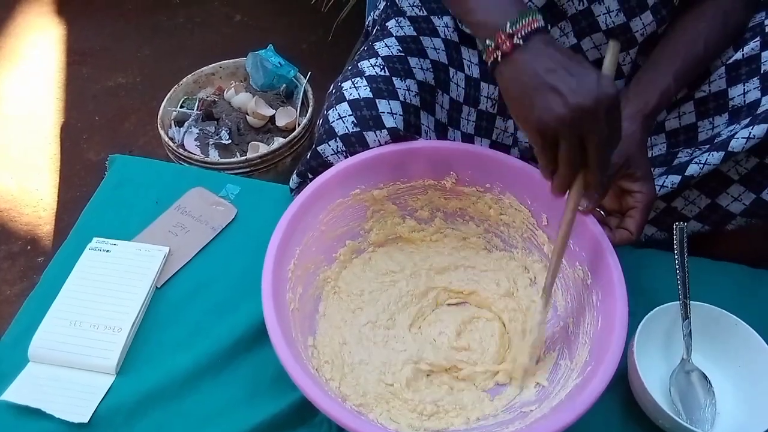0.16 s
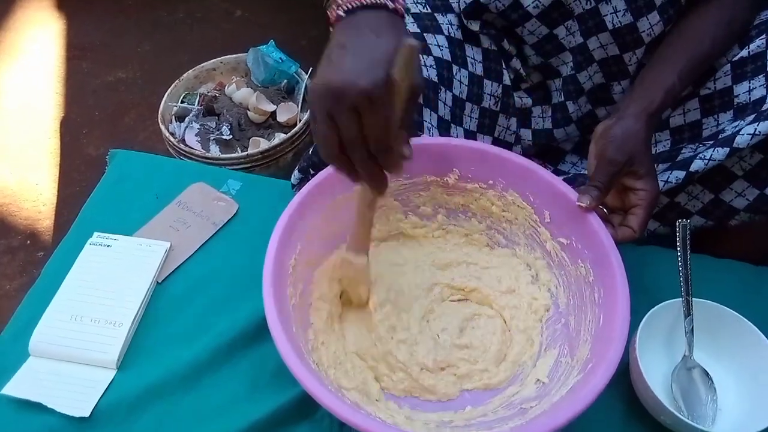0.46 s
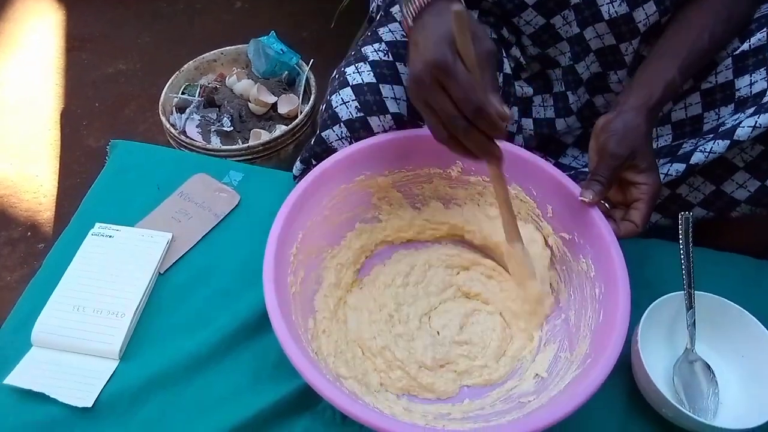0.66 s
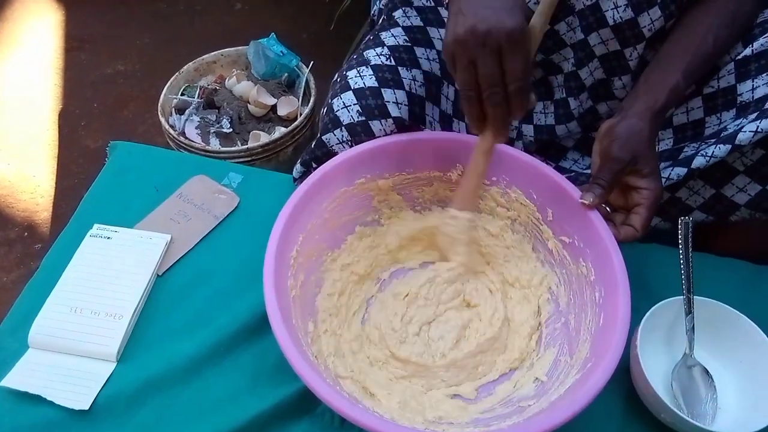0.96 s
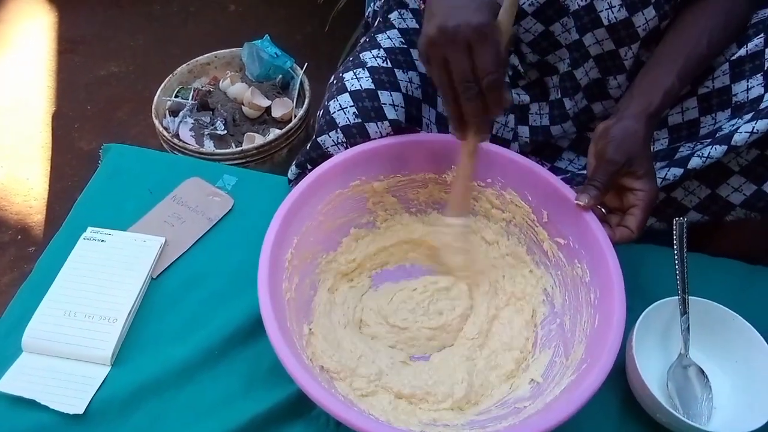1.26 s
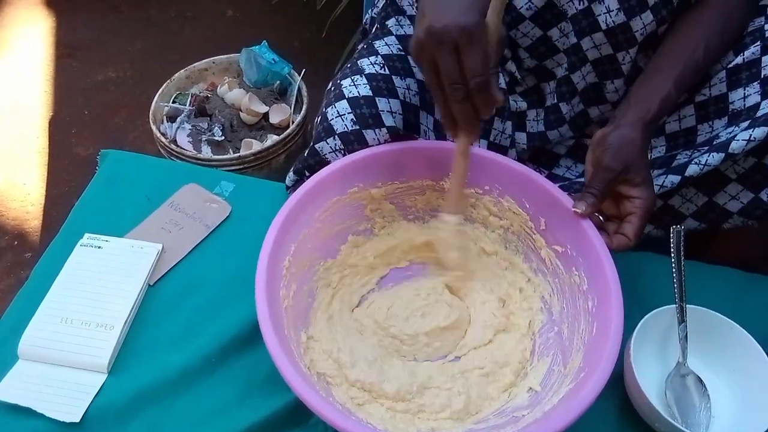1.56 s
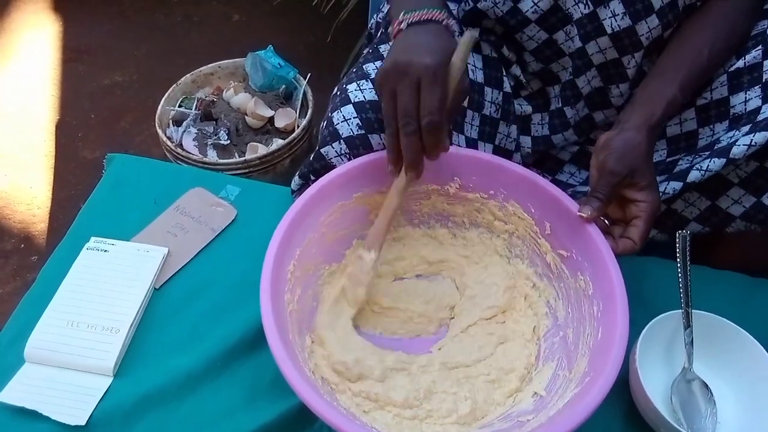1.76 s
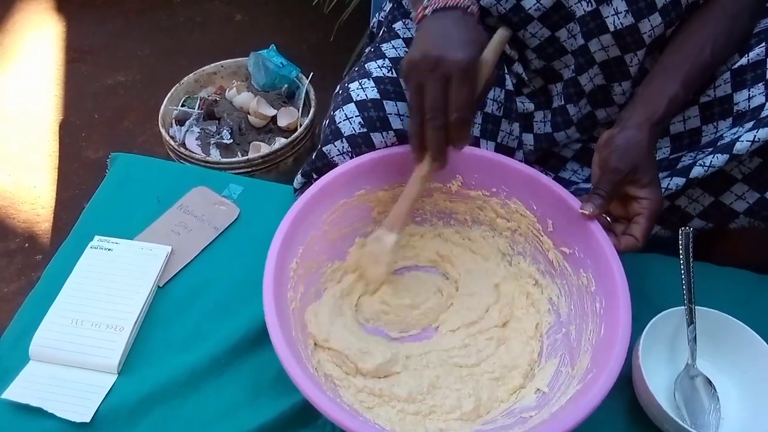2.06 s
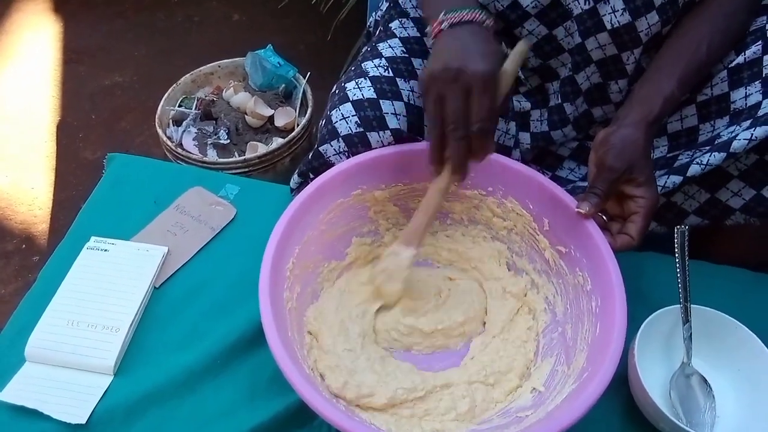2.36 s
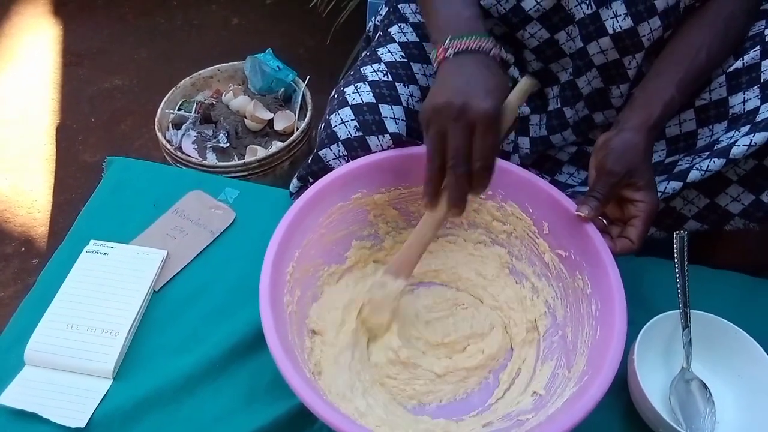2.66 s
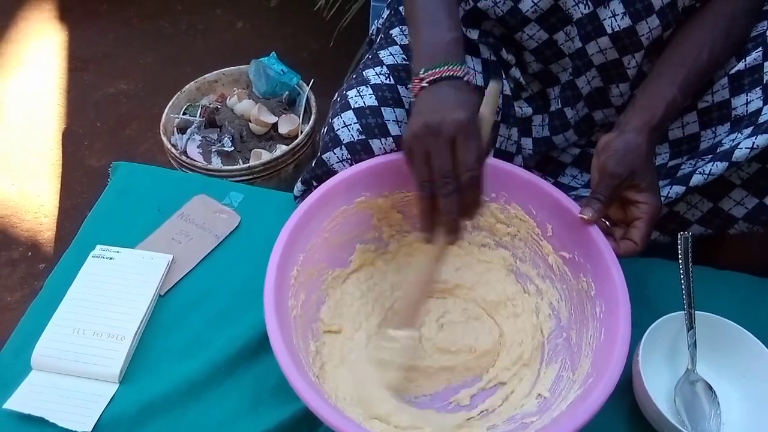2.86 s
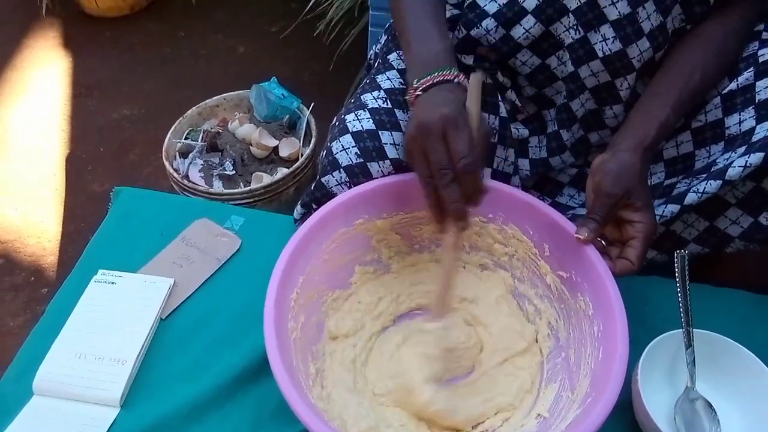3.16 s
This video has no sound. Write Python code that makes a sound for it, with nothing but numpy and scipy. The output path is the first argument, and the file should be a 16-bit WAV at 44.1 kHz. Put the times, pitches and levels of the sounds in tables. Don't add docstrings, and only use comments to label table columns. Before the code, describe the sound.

A wooden spoon beats thick batter in a plastic bowl, close to a small microphone outdoors. A near-quiet start, then a knock, crackling wet smears, sharp snaps, small pops and dull hollow knocks until the end.

```python
import sys
import numpy as np
from scipy import signal
from scipy.fft import rfft, irfft, next_fast_len
from scipy.io import wavfile
from scipy.ndimage import uniform_filter1d

SR = 44100
rng = np.random.default_rng(int(sys.argv[2]) if len(sys.argv) > 2 else 0)


def nominal_scale(level):
    x = np.asarray(level, float) / 20
    return 10 ** x


def digitize_waveform(pressure):
    field = np.atleast_2d(pressure).T
    bounded = np.clip(field, -1, 1)
    quanta = np.round(bounded * 32767).astype(np.int16)
    wavfile.write(sys.argv[1], SR, quanta)


N = 145530


def rms_one(x):
    return x / np.sqrt(np.mean(x ** 2) + 1e-20)


def colour(x, points):
    hz, db = np.transpose(points)
    size = next_fast_len(N + 8192)
    bin_hz = np.arange(size // 2 + 1) * SR / size
    log_gain = np.interp(np.log(bin_hz + 1), np.log(hz), db) * np.log(10) / 20
    ceps = irfft(log_gain, size)
    ceps[1:size // 2] *= 2
    ceps[size // 2 + 1:] = 0
    return irfft(rfft(x, size) * np.exp(rfft(ceps)), size)[..., :N]


def band_pass(x, band_hz):
    return signal.sosfilt(signal.butter(2, band_hz, "band", fs=SR, output="sos"), x)


def drift(rate_hz):
    r = np.exp(-2 * np.pi * rate_hz / SR)
    slow = signal.lfilter([1], [1, -2 * r, r * r], rng.standard_normal(N + SR))
    return rms_one(slow[SR:])


def ring(impulses, hz, t60_s):
    r, w = nominal_scale(-60 / (t60_s * SR)), 2 * np.pi * hz / SR
    return signal.lfilter([0, np.sin(w)], [1, -2 * r * np.cos(w), r * r], impulses + 1e-18)


def add(out, start_s, sound):
    i = int(start_s * SR)
    out[i:i + len(sound)] += sound[:N - i]


def yard():
    # (frequency [Hz], level [dB per Hz])
    air_curve = [(30, 7), (70, 1.5), (200, 2.5), (800, -1), (2000, -5), (16000, -16)]
    # (time [s], level [dB])
    push_curve = [(0, -54.5), (.1, -89), (.42, -53.5), (.65, -74), (.95, -51.5), (1.1, -80), (1.35, -58.5),
                  (1.75, -80), (2.33, -54), (2.5, -66), (2.72, -61.5), (2.85, -64), (3.2, -63)]
    rumble_hz, rumble_db, lump_db = (46.3, 137), 8.5, 3
    air_db = -53

    push_db = np.interp(np.arange(N) / SR, *np.transpose(push_curve))
    rumble = rms_one(band_pass(rng.standard_normal(N), rumble_hz))
    rumble = rumble * nominal_scale(push_db + rumble_db + lump_db * drift(8))
    air = rms_one(colour(rng.standard_normal(N), air_curve))
    return nominal_scale(air_db) * air + rumble


def stroke(start_s, length_s):
    attack_s, release_s = 0.0031, 0.0086
    t = np.arange(N) / SR - start_s
    attack = np.clip(t / attack_s + 0.5, 0, 1)
    return attack * np.exp(-np.maximum(t - length_s + release_s, 0) / release_s)


def clicks(rate_per_s, spread_db):
    hits = rng.random(N) < rate_per_s / SR
    heights = nominal_scale(spread_db * np.minimum(rng.exponential(1, N), 5))
    return hits * heights * rng.choice([-1, 1], N)


def grains(band_hz):
    grains_per_s, spread_db, clump_db, patch_db, ring_cycles = 4000, 2.6, 2.5, 4.5, 16.0
    evenness = 0.4
    source = clicks(grains_per_s, spread_db) * nominal_scale(clump_db * drift(60))
    dealt = rng.integers(0, 10, N)
    out = 0
    for k, hz in enumerate(np.geomspace(*band_hz, num=10)):
        patches = source * (dealt == k) * nominal_scale(patch_db * drift(7.4))
        once = ring(patches, hz, ring_cycles / hz)
        out = out + ring(once, hz, 2 / hz) * hz
    power = uniform_filter1d(out ** 2, size=1800).clip(1e-9)
    return rms_one(out / power ** evenness)


def friction():
    wipes_per_s, spread_db, patch_db = 6900, 6, 4.5
    edges_hz = np.geomspace(5900, 17000, num=6)
    out = 0
    for band_hz in zip(edges_hz, edges_hz[1:]):
        patches = nominal_scale(patch_db * drift(8.3))
        out = out + patches * band_pass(clicks(wipes_per_s, spread_db), band_hz)
    return rms_one(out)


def batter():
    # (start [s], length [s], level [dB], weight of heavy grains [dB])
    smear_rows = [(0.282, 0.13, -40, 1.5), (0.55, 0.063, -42, -8), (0.624, 0.063, -41.5, -1.5),
                  (0.712, 0.15, -42.5, 3), (0.867, 0.082, -35.5, -6.5), (0.967, 0.061, -43, -9),
                  (1.039, 0.039, -41.5, 4), (1.249, 0.12, -42, 5.5), (1.449, 0.11, -41, 5.5),
                  (1.525, 0.047, -38, -4.5), (1.753, 0.01, -53, 13), (1.808, 0.041, -44.5, 12.5),
                  (1.923, 0.015, -32.5, -27), (2.057, 0.052, -41.5, 14), (2.116, 0.023, -41, -10),
                  (2.151, 0.063, -39, 0), (2.305, 0.06, -39, 5.5), (2.377, 0.049, -40.5, 4),
                  (2.449, 0.055, -41, -4), (2.508, 0.031, -42.5, -7), (2.587, 0.082, -40, -8),
                  (2.673, 0.034, -34, -3), (2.74, 0.1, -40, -6), (2.841, 0.047, -43, 3.5),
                  (2.914, 0.1, -33, -1.5), (3.106, 0.049, -57.5, 14.5), (3.21, 0.055, -43, -1.5)]
    # (start [s], length [s], level [dB], weight of heavy grains [dB])
    more_smear_rows = [(0, 0.039, -51, 0), (0.405, 0.2, -54, 3), (1.09, 0.046, -43, -8),
                       (1.172, 0.074, -63.5, 21.5), (1.399, 0.041, -47.5, 4.5), (1.618, 0.043, -44.5, 2),
                       (1.702, 0.011, -61, 13), (1.981, 0.014, -45.5, 4), (2.244, 0.018, -38, -1),
                       (2.517, 0.015, -36.5, -2), (3.026, 0.077, -41.5, -8), (3.121, 0.096, -46.5, 0),
                       (3.224, 0.14, -54, 11.5)]
    # (start [s], length [s])
    wipe_rows = [(0.247, 0.16), (0.68, 0.28), (1.095, 0.059), (1.275, 0.11), (1.51, 0.053), (1.637, 0.054),
                 (1.73, 0.061), (2.073, 0.058), (2.2, 0.037), (2.319, 0.1), (2.472, 0.09), (2.613, 0.06),
                 (2.838, 0.042), (2.923, 0.11), (3.13, 0.09)]
    stir_db, smear_db, wipe_db = -64, -7.5, 1.5
    bright_hz, heavy_hz = (2980, 5660), (533, 1835)

    bright = heavy = np.full(N, nominal_scale(stir_db))
    for start_s, length_s, level_db, weight_db in list(smear_rows) + list(more_smear_rows):
        shape = stroke(start_s + 0.0039, length_s) * nominal_scale(level_db + smear_db)
        bright = bright + shape
        heavy = heavy + shape * nominal_scale(weight_db)
    contact = 0.26 + sum(stroke(*row) for row in wipe_rows)
    follow = (bright / nominal_scale(-38.0)) ** 0.71
    edge = contact * follow * nominal_scale(-42.5 + wipe_db + 2 * drift(35))
    return bright * grains(bright_hz) + heavy * grains(heavy_hz) + edge * friction()


def knocks():
    # (time [s], peak level [dB], hardness [dB per octave])
    knock_rows = [(0.245, -30.5, 0.5), (0.296, -40.5, 1), (0.688, -45, 2), (0.79, -43, -2),
                  (0.949, -42.5, -0.5), (1.218, -40.5, -5), (1.492, -38.5, -14), (1.57, -38, 1),
                  (1.769, -34.5, -2.5), (1.872, -35.5, -3), (1.983, -45.5, -0.5), (2.039, -38, -2),
                  (2.061, -34, 5.5), (2.124, -29.5, -1), (2.587, -37, -8), (2.997, -30.5, 2),
                  (3.28, -41.5, -0.5)]
    # (frequency [Hz], level [dB], t60 [s])
    bowl_modes = [(234.8, -8, 0.088), (393, -8, 0.043), (467, -5.5, 0.037), (722, -13, 0.021),
                  (990, -9.5, 0.019)]
    detune, tick_db = 0.02, -18
    thud_hz, thud_db, thud_s = (150, 1000), -13.0, 0.013

    out, t = np.zeros(N), np.arange(4000) / SR
    hz, level_db, t60_s = np.transpose(bowl_modes)[:, :, None]
    luck = rng.standard_normal((len(knock_rows), 2, len(bowl_modes), 1))
    thuds = band_pass(rng.standard_normal((len(knock_rows), len(t))), thud_hz)
    thud_shape = nominal_scale(thud_db) * np.exp(-t / thud_s) * np.minimum(t * 1000, 1)
    tick = nominal_scale(tick_db) * np.exp(-0.5 * ((t - 2e-4) / 6e-5) ** 2)
    for (time_s, peak_db, hard_db), (loud, tune), thud in zip(knock_rows, luck, thuds):
        start_db = level_db + hard_db * np.log2(hz / hz[0]) + 2 * loud
        decay_db = 60 * t / t60_s * nominal_scale(loud[::-1])
        modes = nominal_scale(start_db - decay_db) * np.sin(2 * np.pi * hz * (1 + detune * tune) * t)
        sound = rms_one(thud) * thud_shape - modes.sum(axis=0) - tick
        add(out, time_s + 0.0036, nominal_scale(peak_db) * sound)
    return out


def snaps():
    # (time [s], peak level [dB], pitch [Hz])
    early_rows = [(0.2487, -26.5, 4670), (0.3904, -38, 4970), (0.5818, -33, 3270), (0.5855, -27.5, 3500),
                  (0.6407, -30, 4540), (0.6457, -46, 4120), (0.6588, -30, 4470), (0.6611, -36, 5130),
                  (0.7412, -29.5, 4900), (0.748, -28.5, 4200), (0.7635, -35, 4780), (0.7925, -29, 4620),
                  (0.7983, -29.5, 4000), (0.802, -29.5, 4360), (0.8146, -25, 4000), (0.8189, -32, 4290),
                  (0.8837, -24, 3270), (0.8952, -37, 3660), (0.8997, -17.5, 3680), (0.9056, -36, 3890),
                  (0.9142, -18, 3700), (0.9164, -36, 4730), (0.9351, -27, 4230), (0.9758, -26.5, 3930),
                  (0.9789, -29, 4030), (0.9817, -27, 3820), (0.9928, -26.5, 4000), (1.0031, -35, 5100),
                  (1.0469, -28, 4620), (1.0641, -23, 4550), (1.1265, -47, 4830), (1.2885, -21, 4750),
                  (1.3437, -30.5, 5070), (1.3483, -44, 3970), (1.4532, -20.5, 4700), (1.4573, -16, 4450),
                  (1.4608, -12, 4100), (1.4631, -38, 4440), (1.4684, -27, 4490), (1.4812, -24.5, 3420),
                  (1.4872, -28, 4740), (1.4943, -31, 4170), (1.5268, -29, 4860), (1.5305, -27, 3700),
                  (1.5425, -31, 4900), (1.6393, -36, 4860)]
    # (time [s], peak level [dB], pitch [Hz])
    late_rows = [(1.6441, -37, 5100), (1.6663, -34, 4460), (1.741, -25.5, 5400), (1.7469, -29, 4670),
                 (1.7504, -28, 4950), (1.7522, -23.5, 4250), (1.8244, -30, 3400), (1.8317, -28.5, 4020),
                 (1.8758, -37, 4940), (1.878, -34, 4620), (1.9325, -25.5, 5100), (1.9552, -26.5, 4300),
                 (2.0429, -36, 3900), (2.0657, -33, 3900), (2.0773, -30.5, 4830), (2.0888, -28, 4800),
                 (2.0912, -22.5, 3740), (2.1289, -32, 4470), (2.168, -36, 3580), (2.1869, -39, 4600),
                 (2.3397, -26.5, 4340), (2.3488, -28.5, 4270), (2.3844, -36, 4300), (2.4084, -38, 4530),
                 (2.5256, -24.5, 3650), (2.596, -40, 4660), (2.6208, -29.5, 3280), (2.6801, -17, 4320),
                 (2.6822, -38, 4560), (2.6841, -33, 4770), (2.7674, -20, 3800), (2.8112, -28, 3770),
                 (2.855, -31, 4750), (2.8638, -28, 3930), (2.9196, -18, 4100), (2.9217, -46, 3810),
                 (2.9275, -35, 4140), (2.9535, -47, 4230), (2.979, -31.5, 4650), (2.9844, -38, 4230),
                 (2.9959, -27, 5140), (2.9978, -38, 4680), (3.0007, -42, 4180), (3.0109, -53, 4300),
                 (3.1503, -30.5, 4650), (3.2449, -32.5, 4730)]
    snap_db, whistle_s = -1, 0.00036
    crack_db, crack_ref_hz = -4, 4150
    tail_db, tail_s = -4.5, 0.0034

    out, t = np.zeros(N), np.arange(-100, 1200) / SR
    rows = list(early_rows) + list(late_rows)
    whistle_shape = np.exp(-0.5 * (t / whistle_s) ** 2)
    crack_shape = nominal_scale(crack_db) * (np.exp(-0.5 * (t / 3e-5) ** 2) + 0.6 * (t == 0))
    tail_shape = nominal_scale(tail_db) * (t >= 0) * np.exp(-t / tail_s)
    for (time_s, peak_db, hz), fizz in zip(rows, rng.standard_normal((len(rows), len(t)))):
        lift_db = 5.0 * max(hz / 1000 - 4.5, 0)
        whistle = whistle_shape * np.sin(2 * np.pi * hz * t) * nominal_scale(lift_db)
        crack = crack_shape * (crack_ref_hz / hz) ** 1.6
        tail = tail_shape * uniform_filter1d(fizz, size=3)
        add(out, time_s + t[0], nominal_scale(peak_db + snap_db) * (whistle + tail - crack))
    return out


def pops():
    # (time [s], peak level [dB], pitch [Hz])
    pop_rows = [(0.571, -41, 1500), (0.872, -41, 1070), (0.933, -37.5, 580), (1.062, -40, 840),
                (1.203, -43.5, 800), (1.288, -41.5, 1060), (1.48, -38, 2210), (1.529, -30.5, 1960),
                (1.822, -39.5, 1200), (2.219, -38.5, 960), (2.342, -43.5, 1480), (2.589, -35.5, 1180),
                (2.679, -41.5, 910), (2.798, -43.5, 990), (2.863, -37.5, 830), (0.602, -46, 1110),
                (0.746, -46.5, 1240), (1.333, -41.5, 980), (1.635, -47.5, 940), (1.809, -47, 570),
                (1.93, -45.5, 1250), (2.089, -41, 780), (2.383, -44, 961), (2.517, -44, 1070),
                (2.845, -43, 926), (2.983, -36, 910), (3.26, -42.5, 880), (3.07, -43.5, 1540),
                (3.149, -44, 1006)]
    # (time [s], peak level [dB], pitch [Hz])
    clack_row = (2.0635, -33, 2360)
    pop_db, click_db, ring_cycles, rise = 9.5, -6, 2.2, 0.04

    out, t = np.zeros(N), np.arange(900) / SR
    for time_s, peak_db, hz in list(pop_rows) + [clack_row]:
        cycles = t * hz
        shape = np.minimum(cycles, 1) * nominal_scale(-60 * cycles / (4 * ring_cycles))
        tone = shape * np.sin(2 * np.pi * cycles * (1 + rise * cycles / 10))
        click = nominal_scale(click_db) * np.exp(-0.5 * (20 * (cycles - 1)) ** 2)
        add(out, time_s, nominal_scale(peak_db + pop_db) * (tone + click))
    return out


def scene():
    bowl = nominal_scale(13.0) * (knocks() + pops())
    return (yard() + batter() + bowl + snaps())[None]


def band_limit(x):
    return signal.sosfilt(signal.butter(12, 16890, fs=SR, output="sos"), x)


def record(dry):
    # (frequency [Hz], gain [dB])
    mic_curve = [(25, -46), (60, -16), (2100, -5.5), (4500, 1.5), (7900, -25.5), (10000, -22),
                 (13500, -33.5), (15600, -20.5)]
    # (frequency [Hz], gain [dB])
    port_curve = [(5500, -1), (6700, 4), (7400, -1), (9000, 1.06)]
    gate_db, gate_slope, gate_s = -58, 1, 0.012
    cutoff_hz = 16100

    x = colour(colour(dry, mic_curve), port_curve)
    treble = signal.lfilter([1, -1], [1, -0.95], x)
    power = uniform_filter1d(treble ** 2, size=int(gate_s * SR)).clip(1e-12)
    level_db = 10 * np.log10(power)
    x = x * nominal_scale(gate_slope * np.clip(level_db - gate_db, -15, 0))
    x = signal.sosfilt(signal.cheby2(12, 50, cutoff_hz + 500, fs=SR, output="sos"), x)
    return band_limit(x)


dry = scene()
out = record(dry)
digitize_waveform(out)
```